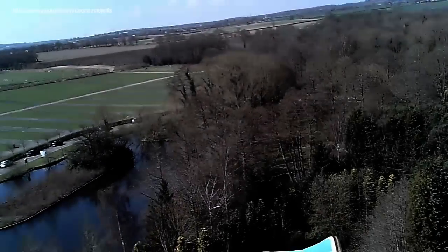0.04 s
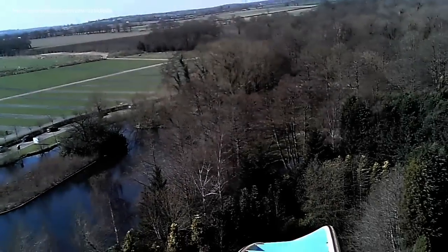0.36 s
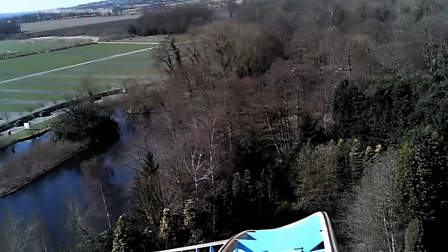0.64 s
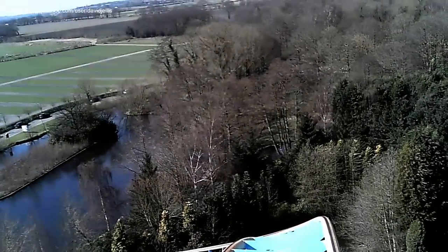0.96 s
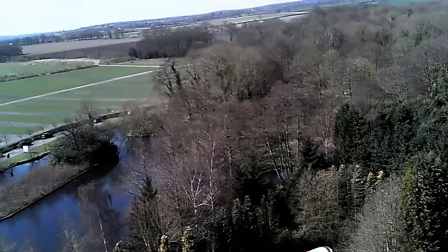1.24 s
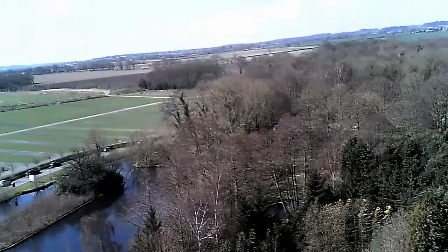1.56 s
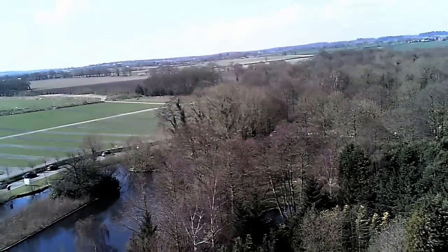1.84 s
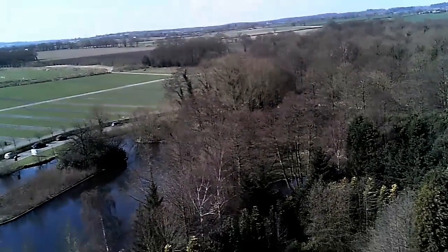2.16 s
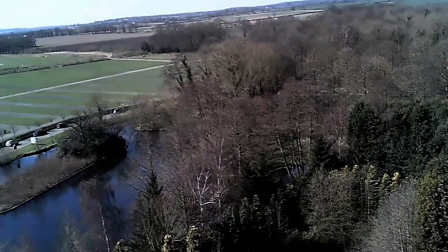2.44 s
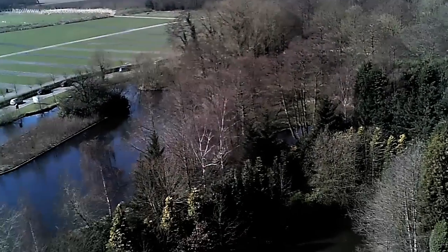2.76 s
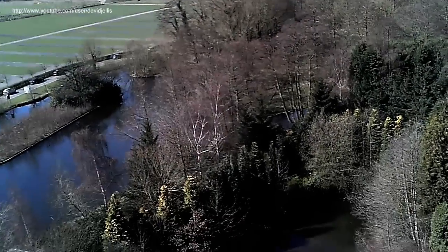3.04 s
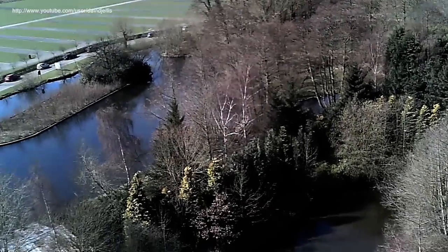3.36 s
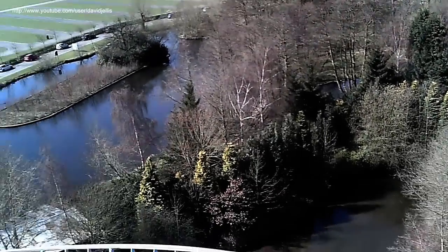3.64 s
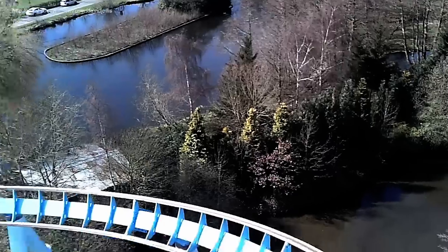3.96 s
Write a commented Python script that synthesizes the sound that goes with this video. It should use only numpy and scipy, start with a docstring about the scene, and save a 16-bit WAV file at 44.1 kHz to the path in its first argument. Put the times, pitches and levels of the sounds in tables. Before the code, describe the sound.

A roller coaster's lift ratchet clicks fast and evenly, then dulls and fades over droning chain and rolling wheels. The car knocks, a latch clanks, and wind increasingly buffets the onboard microphone with small crackles.

```python
"""A seat in a roller coaster car as it crests the lift hill.
The safety pawl strikes the rack fifteen times a second, each impact exciting the modes of the steel;
then only duller ticks from further along the train remain. The chassis knocks and, later, a latch
clanks over the broadband roar of the wheels and the narrow-band drone of the chain. As the train
gathers speed, turbulent wind buffets the microphone and small crackles set in."""
import sys
import numpy as np
from scipy import signal
from scipy.fft import rfft, irfft
from scipy.io import wavfile

SR = 44100
rng = np.random.default_rng(int(sys.argv[2]) if len(sys.argv) > 2 else 0)


def put_to_file(sound):
    """Save the sound as 16-bit audio at rate SR, in the file named by the first command-line argument."""
    columns = np.atleast_2d(sound).T  # one column per channel
    safe = np.clip(columns, -1, 1)
    whole_steps = np.round(safe * 32767)
    wavfile.write(sys.argv[1], SR, whole_steps.astype(np.int16))


N = 176400
T = np.arange(N) / SR
RING_N = SR // 2  # samples in one impact response
RING_T = T[:RING_N]


def amp(db):
    """Amplitude ratio of a level in decibels."""
    return 10 ** (np.asarray(db) / 20)


def unit(x):
    """Normalisation to rms 1."""
    return x / np.sqrt(np.mean(x ** 2) + 1e-20)


def at_frequency(points, hz):
    """Interpolation of a table on a logarithmic frequency axis."""
    table_hz, value = np.transpose(points)
    return np.interp(np.log(hz + 1), np.log(table_hz + 1), value)


def envelope(points):
    """Amplitude envelope through points of (time [s], level [dB])."""
    return amp(np.interp(T, *np.transpose(points)))


def add(mix, onset, sound):
    """Superposition of a sound on the mix, from an onset in seconds."""
    part = mix[max(round(onset * SR), 0):][:len(sound)]
    part += sound[:len(part)]


def noise(spectrum, size=N):
    """Spectral shaping of white noise, at rms 1."""
    gain = amp(at_frequency(spectrum, np.fft.rfftfreq(size, 1 / SR)))
    return unit(irfft(rfft(rng.standard_normal(size)) * gain, size))


def decay(t60):
    """Exponential damping: 60 dB in the decay time t60."""
    return amp(-60 * RING_T / t60)


def burst(spectrum, t60):
    """Damped noise, the response of many overlapping modes."""
    return noise(spectrum, RING_N) * decay(t60)


def attack(rise_s):
    """Linear rise to full amplitude."""
    return np.minimum(RING_T / rise_s, 1)


def pulse(centre, half_width, t=T):
    """Gaussian envelope, down to 1/e at one half-width from its centre."""
    return np.exp(-((t - centre) / half_width) ** 2)


def ring(modes):
    """Free vibration: a sum of damped sinusoids of random phase."""
    return sum(amp(db) * decay(t60) * np.sin(2 * np.pi * (hz * RING_T + rng.random()))
               for hz, db, t60 in modes)


# Pawl impacts: (time [s], relative level [dB], high-band gain [dB], clack-band gain [dB],
# frequency favoured by the contact [Hz])
PAWL_IMPACTS = [(0.0440,-0.5,-1,5,2900),(0.1097,-1.5,0,-8,3470),(0.1742,-0.5,-1,-14,3200),(0.241,-2,-2.5,1,2900),(0.3057,-1,-3,-7,2900),(0.3724,2,-2.5,4.5,3350),(0.438,-2,-1,4,3360),(0.5043,-0.5,-11,-2,2400),(0.5715,-3.5,-8,4,2970),(0.6391,-3.5,-14,-12,2880),(0.7061,-6.5,-16,-6,3180)]
# Modes of the pawl: (frequency [Hz], relative level [dB], decay time [s])
PAWL_MODES = [(2430,-13,0.016),(2880,-5,0.024),(3380,-4,0.015),(3970,-23,0.011),(4660,-19,0.0092),(5600,-16.5,0.02),(8550,-12.5,0.013),(10340,-7.5,0.011),(11700,-13.5,0.011),(12500,-30,.008)]
# Knock of the frame: (frequency [Hz], relative spectral density [dB])
FRAME_SPECTRUM = [(200,-2),(600,6.5),(1100,0),(1650,-13),(2100,-27),(2600,-5),(8000,-56)]
# Scattered or distant pawl sound: (frequency [Hz], relative spectral density [dB])
SCATTERED_SPECTRUM = [(300,-22),(1600,9),(2300,-7),(3050,5),(4200,-12.5),(5600,-7),(7000,-14.5),(10400,-11),(13300,-19.5),(14000,-50)]
CONTACT_RISE_S, SCRAPE_S = 0.00058, 0.0014
CLACK_ABOVE_HZ, HIGH_ABOVE_HZ = 3700, 6000
FAVOUR_DB, FAVOUR_WIDTH_HZ, RELATIVE_DETUNE = 4.5, 350, 0.0088

def pawl():
    """Impact excitation: a brief scrape on each tooth drives the modes; the frame knocks and scatters."""
    out = np.zeros(N)
    contact = np.exp(-RING_T / SCRAPE_S) * attack(CONTACT_RISE_S)
    for onset, db, high_db, clack_db, favoured_hz in PAWL_IMPACTS:
        tick = np.zeros(RING_N)
        for hz, mode_db, t60 in PAWL_MODES:
            detuned_hz = hz * (1 + RELATIVE_DETUNE * rng.standard_normal())
            mode = ring([(detuned_hz, 0, t60)])
            force = rng.standard_normal(RING_N) * contact
            response = signal.fftconvolve(force, mode)[:RING_N]
            band_db = high_db if hz > HIGH_ABOVE_HZ else clack_db if hz > CLACK_ABOVE_HZ else 0
            favour_db = FAVOUR_DB * np.exp(-((hz - favoured_hz) / FAVOUR_WIDTH_HZ) ** 2)
            tick += amp(mode_db + band_db + favour_db) * unit(response)
        knock = amp(-29) * burst(FRAME_SPECTRUM, t60=0.091)
        scattered = amp(-42) * burst(SCATTERED_SPECTRUM, t60=0.14)
        add(out, onset, amp(db) * (amp(-50.5) * tick + knock + scattered))
    return out


# Impacts further along the train, one per tooth: (relative level [dB])
DISTANT_IMPACTS = [3.5,4.5,-1,3.5,-1,2,2,-0.5,0.5,1.5,-0.5,2,2.5,2.5,0.5,-0.5,1,-3.5,-24,0,-4.5,-2.5]
DISTANT_START_S, TOOTH_PERIOD_S = 0.5715, 0.06698

def distant_pawls():
    """Attenuation and scattering: the same beat arrives from further away, soft and smeared."""
    out = np.zeros(N)
    for tooth, db in enumerate(DISTANT_IMPACTS):
        tick = burst(SCATTERED_SPECTRUM, t60=0.096) * attack(0.0011)
        add(out, DISTANT_START_S + tooth * TOOTH_PERIOD_S, amp(db - 38.5) * tick)
    return out


# Heavy knocks in the chassis: (time [s], knock level [dB], thud level [dB])
CHASSIS_IMPACTS = [(1.2654,-17,-33),(1.275,-25.5,-21.5),(1.38,-35,-44)]
# Dense resonances of the chassis: (frequency [Hz], relative spectral density [dB])
CHASSIS_SPECTRUM = [(100,0),(500,0),(950,4),(1150,-1),(1750,2.5),(2100,1.5),(2500,-15),(3200,-3.5),(4200,-27),(5600,-14),(6600,-18),(9000,-17.5),(14000,-31)]
# Their damping: (frequency [Hz], decay time [s])
CHASSIS_DECAY = [(200,0.39),(900,0.35),(2000,.17),(5000,0.15),(12000,0.064)]
# Distinct modes of the chassis: (frequency [Hz], relative level [dB], decay time [s])
CHASSIS_MODES = [(962,-0.5,0.42),(1306,-8,0.43),(1705,-4,0.32),(2000,-9,0.1),(5400,-6,0.055)]
# Low thud of a knock or a wind buffet: (frequency [Hz], relative spectral density [dB])
THUD_SPECTRUM = [(20,-3),(70,-6.5),(125,5),(190,-9.5),(280,-2.5),(450,-15.5),(1000,-40),(3000,-74)]

def chassis_knocks():
    """Frequency-dependent damping: the treble of each knock dies first; a low thud follows the impact."""
    out = np.zeros(N)
    for onset, db, thud_db in CHASSIS_IMPACTS:
        hz, t, bands = signal.stft(noise(CHASSIS_SPECTRUM, RING_N), SR, nperseg=256)
        damping = amp(-60 * t / at_frequency(CHASSIS_DECAY, hz)[:, None])
        body = signal.istft(bands * damping, SR)[1][:RING_N]
        ringing = amp(-9.5) * ring(CHASSIS_MODES)
        add(out, onset, amp(db) * (body + ringing) * attack(0.003))
        thud = noise(THUD_SPECTRUM, RING_N) * pulse(centre=0.058, half_width=0.021, t=RING_T)
        add(out, onset, amp(thud_db) * thud)
    return out


# Chattering contacts of a steel latch: (time [s], relative level [dB])
LATCH_IMPACTS = [(2.9150,-5.5),(2.918,-1),(2.925,-2),(2.930,-5.5)]
# Modes of the latch: (frequency [Hz], relative level [dB], decay time [s])
LATCH_MODES = [(1220,2.5,0.054),(1404,-2,0.055),(1615,-4,0.066),(1940,-3.5,0.066),(2050,-1.5,0.048),(3190,-7.5,0.08),(4710,-20,0.081),(5404,-2.5,0.057),(5510,-14,.06),(8500,-13,0.06),(11200,-9,0.037)]
# Bright crash of each contact: (frequency [Hz], relative spectral density [dB])
LATCH_SPECTRUM = [(300,-6),(1200,-1.5),(2100,2.5),(3000,-6),(4200,-14),(5400,-1.5),(6300,-11),(8500,-11),(11000,-7.5),(12700,-16),(14500,-29)]

def latch():
    """Energy storage in modes: each rough contact crashes and adds energy, which damping drains."""
    energy_in, out = np.zeros(N), np.zeros(N)
    for onset, db in LATCH_IMPACTS:
        add(out, onset, amp(db - 21) * burst(LATCH_SPECTRUM, t60=0.06))
        add(energy_in, onset, amp([db - 22.5]) ** 2)
    for hz, db, t60 in LATCH_MODES:
        kept_per_sample = 1e-6 ** (1 / (t60 * SR))
        energy = signal.lfilter([1], [1, -kept_per_sample], energy_in)
        out += amp(db) * np.sqrt(energy) * np.sin(2 * np.pi * (hz * T + rng.random()))
    return out


# Wind on the microphone: (frequency [Hz], relative spectral density [dB])
WIND_SPECTRUM = [(15,-8.5),(42,-5),(75,-2),(130,0),(235,-3.5),(285,-6.5),(335,-3.5),(400,-15),(700,-21.5),(1000,-24),(1600,-26.5),(2200,-43),(3100,-46.5),(9000,-70)]
# Its growth with speed, before fluctuation: (time [s], level [dB])
WIND_LEVELS = [(0,-45),(.65,-41.5),(.8,-37),(1.2,-34),(1.52,-29.5),(1.65,-38.5),(1.93,-34.5),(2.15,-29.5),(2.35,-31.5),(2.57,-24.5),(2.72,-27.5),(2.97,-25.5),(3.06,-19),(3.33,-20.5),(3.45,-25),(3.55,-23.5),(3.75,-21),(4,-24)]
# Single buffets of the wind, and at 2.928 s the low thud of the latch: (time [s], level [dB], half-width [s])
BUFFETS = [(2.01,-23,0.027),(2.552,-22.5,0.035),(2.928,-14,0.0056),(3.044,-18.5,0.014),(3.306,-19,0.019),(3.759,-21.5,0.0091)]
GUST_DEPTH_DB, GUST_BANDWIDTH_HZ = 1.5, 10

def wind():
    """Turbulent pressure fluctuation: an uneven rumble that grows with speed, with a few hard buffets; the
    latch's low thud is played here too."""
    low_pass = np.exp(-(np.fft.rfftfreq(N, 1 / SR) / GUST_BANDWIDTH_HZ) ** 2)
    gusts = unit(irfft(rfft(rng.standard_normal(N)) * low_pass, N))
    rumble = noise(WIND_SPECTRUM) * envelope(WIND_LEVELS) * amp(GUST_DEPTH_DB * gusts)
    buffets = sum(amp(db) * pulse(time, half_width) for time, db, half_width in BUFFETS)
    return rumble + noise(THUD_SPECTRUM) * buffets


# Roar of the wheels: (frequency [Hz], relative spectral density [dB])
WHEEL_SPECTRUM = [(30,-19),(140,-1.5),(260,-3),(380,-1.5),(520,2),(660,-1),(820,-4.5),(1200,-11.5),(1700,-12.5),(2200,-31.5),(2600,-24),(3100,-20),(4000,-36),(8000,-74)]
# Its envelope: (time [s], level [dB])
WHEEL_LEVELS = [(0,-34.5),(.15,-32.5),(.6,-34),(1.0,-39.5),(1.35,-33),(1.7,-36.5),(2.3,-37.5),(3,-34),(4,-33.5)]
# Rumble of the car body: (frequency [Hz], relative spectral density [dB])
RUMBLE_SPECTRUM = [(15,-27),(30,-4.5),(42,3.5),(58,-5),(80,-17),(160,-41),(600,-74)]
# Its envelope: (time [s], level [dB])
RUMBLE_LEVELS = [(.17,-53),(.25,-31.5),(.5,-35.5),(.65,-43.5),(1.2,-34),(1.7,-32.5),(2.3,-36.5),(3.3,-25),(3.6,-52)]
# Hiss of the chain: (frequency [Hz], relative spectral density [dB])
HISS_SPECTRUM = [(1500,11.5),(3100,6.5),(4300,-8),(5500,8.5),(6200,-3),(8000,5),(9400,-1.5),(10400,5),(11200,-2.5),(13200,-6),(13900,-40)]
# Its envelope: (time [s], level [dB])
HISS_LEVELS = [(0,-60.5),(.3,-57),(.6,-51.5),(.9,-56),(1.2,-56),(1.4,-49.5),(1.7,-55.5),(2,-57.5),(4,-56.5)]

def rolling():
    """Random vibration: wheels, car body and chain radiate independent bands of noise."""
    roar = noise(WHEEL_SPECTRUM) * envelope(WHEEL_LEVELS)
    rumble = noise(RUMBLE_SPECTRUM) * envelope(RUMBLE_LEVELS)
    hiss = noise(HISS_SPECTRUM) * envelope(HISS_LEVELS)
    return roar + rumble + hiss


# Resonance of the chain: (time [s], centre frequency [Hz], level [dB])
CHAIN_RESONANCE = [(0,560,-38.5),(0.129,585,-40),(.95,510.1,-37),(1.201,505,-38.5),(1.751,559.7,-36.5),(2.198,580,-40.5),(2.698,600,-37),(4,599.2,-46)]
DRONE_HALF_WIDTH_HZ = 90

def chain_drone():
    """Narrow-band resonance: the chain drones restlessly about a pitch that sags and recovers."""
    times, hz, db = np.transpose(CHAIN_RESONANCE)
    band = np.exp(-(np.fft.fftfreq(N, 1 / SR) / DRONE_HALF_WIDTH_HZ) ** 2)
    flutter = np.fft.ifft(band * rng.standard_normal(N) * np.exp(2j * np.pi * rng.random(N)))
    cycles = np.cumsum(np.interp(T, times, hz)) / SR
    carrier = np.exp(2j * np.pi * cycles)
    return unit((flutter * carrier).real) * amp(np.interp(T, times, db))


# Fine crackle: (frequency [Hz], relative spectral density [dB])
CRACKLE_SPECTRUM = [(1000,8.5),(2200,3.5),(3200,12),(4500,-2),(5500,5),(7500,7),(10000,0),(11000,-6.5),(13000,-22),(13900,-50)]
# Its envelope: (time [s], level [dB])
CRACKLE_LEVELS = [(1.9,-67.5),(2.2,-54.5),(2.33,-60),(2.58,-50.5),(2.68,-56.5),(2.86,-48),(3,-55.5),(3.12,-47.5),(3.22,-57.5),(3.35,-53),(3.44,-65),(3.54,-48),(3.63,-63),(3.71,-54),(3.87,-48),(4,-58.5)]
# The loudest crackles: (time [s], level [dB])
SNAPS = [(1.341,-36),(1.692,-39),(2.204,-36),(2.446,-37.5),(2.471,-30.5),(2.549,-33.5),(2.574,-34.5),(2.599,-37),(2.7544,-30),(2.772,-33),(2.8,-33),(3.066,-50),(3.106,-38),(3.118,-31.5),(3.322,-47),(3.335,-41),(3.533,-44),(3.692,-35.5),(3.793,-35),(3.849,-40),(3.883,-30),(3.978,-42)]
CRACKLES_PER_S, CRACKLE_SPREAD_DB = 190, 1.5

def crackle():
    """A Poisson process: tiny dry ticks fall at random and add in energy; a few set snaps stand out."""
    occurs = rng.random(N) < CRACKLES_PER_S / SR
    sizes = occurs * amp(CRACKLE_SPREAD_DB * np.minimum(rng.exponential(1, N), 3))
    energy = abs(signal.fftconvolve(sizes ** 2, decay(t60=0.008) ** 2)[:N])
    amplitude = unit(np.sqrt(energy)) * envelope(CRACKLE_LEVELS)
    for onset, db in SNAPS:
        add(amplitude, onset, amp(db) * decay(t60=0.017))
    return amplitude * noise(CRACKLE_SPECTRUM)


# One dull tap in the frame: (time [s], knock level [dB], knock decay time [s])
FRAME_TAP = (.0985,-28,.035)
# Modes of the frame: (frequency [Hz], level [dB], decay time [s])
FRAME_MODES = [(584,-27.5,0.36),(710,-34.5,0.71),(870,-36,0.73),(1437,-45,1)]

def frame_tap():
    """Free vibration: the lightly damped modes of the frame ring on after one dull tap."""
    out = np.zeros(N)
    onset, db, t60 = FRAME_TAP
    knock = amp(db) * burst(FRAME_SPECTRUM, t60)
    add(out, onset, (knock + ring(FRAME_MODES)) * attack(CONTACT_RISE_S))
    return out


# Squeaks of steel: (time [s], frequency [Hz], level [dB], half-width [s])
SQUEAKS = [(1.389,1735,-28,.01),(1.393,2040,-36,.007)]

def squeaks():
    """Friction-induced vibration: steel on steel gives brief, thin tones."""
    return sum(amp(db) * pulse(time, half_width) * np.sin(2 * np.pi * hz * T)
               for time, hz, db, half_width in SQUEAKS)


def scene():
    """Linear superposition of all sources at the seat, in one channel."""
    impacts = pawl() + distant_pawls() + frame_tap() + chassis_knocks() + latch()
    return (impacts + rolling() + chain_drone() + wind() + crackle() + squeaks())[None]


CUTOFF_HZ = 14250

def record(dry):
    """Band limiting: a low-pass filter removes the highest treble."""
    low_pass = signal.firwin(255, CUTOFF_HZ, window=("kaiser", 9), fs=SR)
    return signal.oaconvolve(dry, low_pass[None], "same")


dry = scene()
out = record(dry)
put_to_file(out)
```